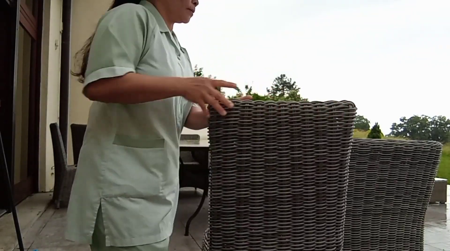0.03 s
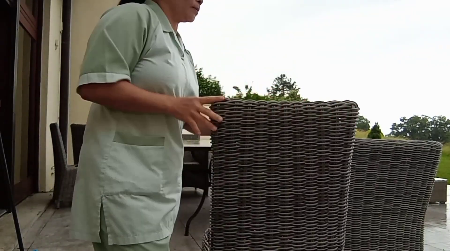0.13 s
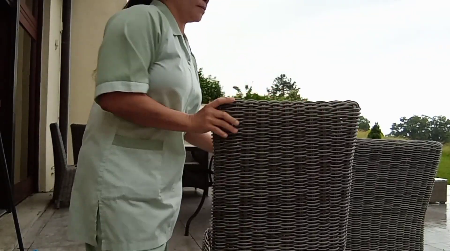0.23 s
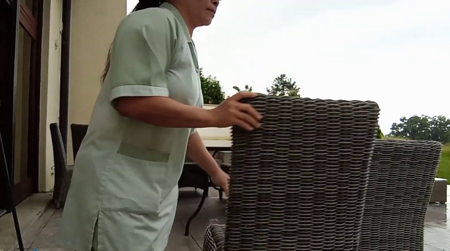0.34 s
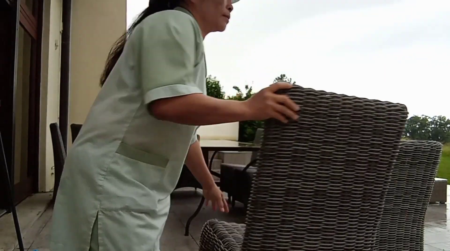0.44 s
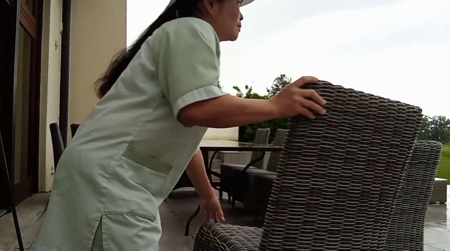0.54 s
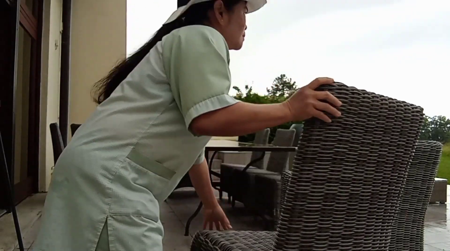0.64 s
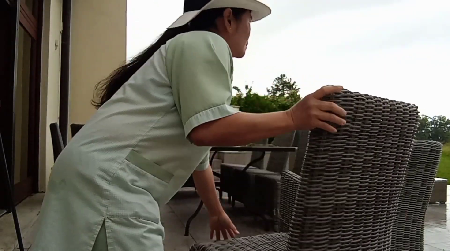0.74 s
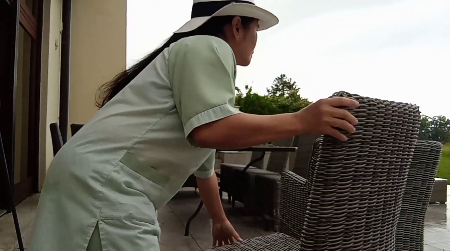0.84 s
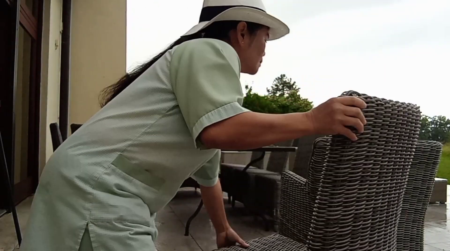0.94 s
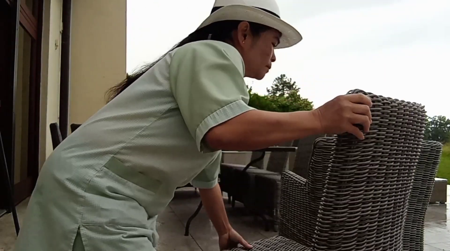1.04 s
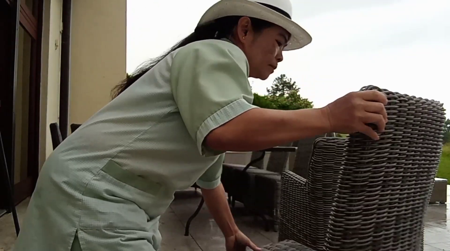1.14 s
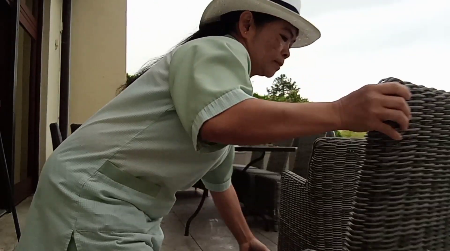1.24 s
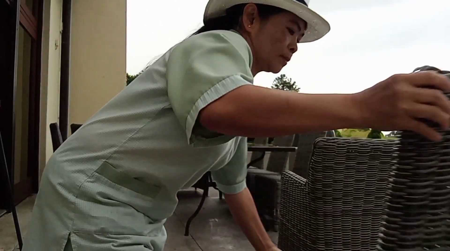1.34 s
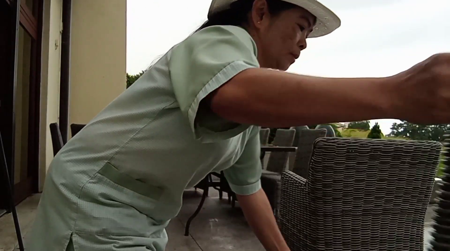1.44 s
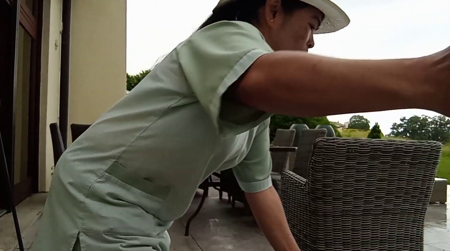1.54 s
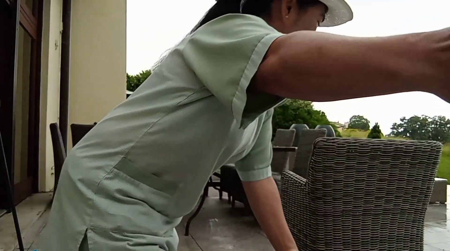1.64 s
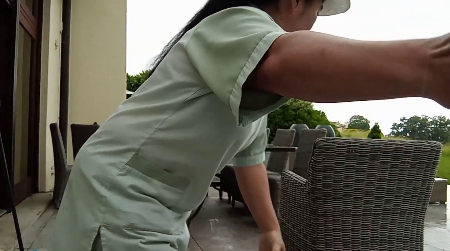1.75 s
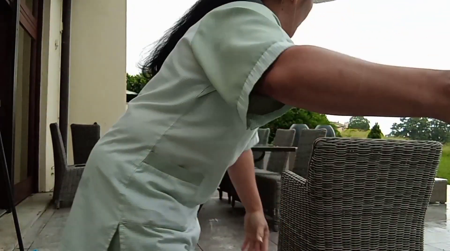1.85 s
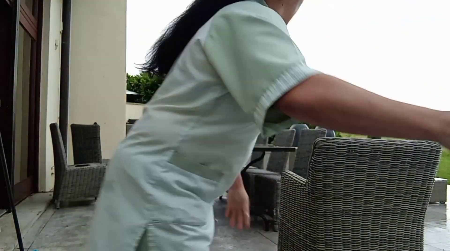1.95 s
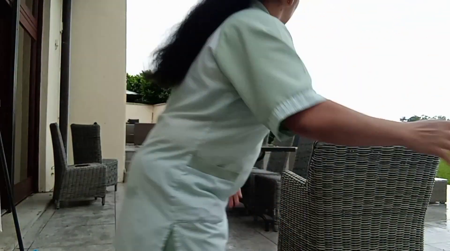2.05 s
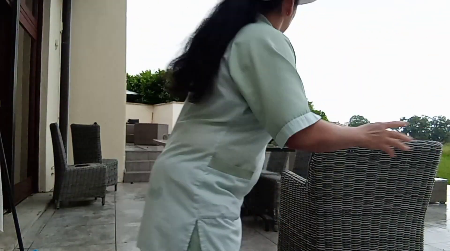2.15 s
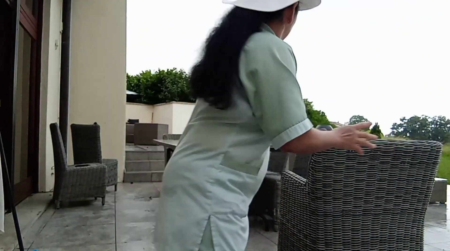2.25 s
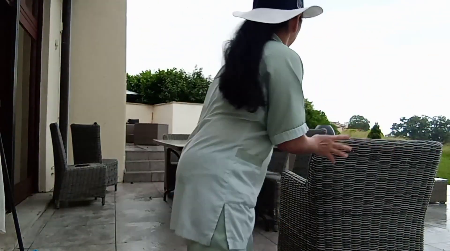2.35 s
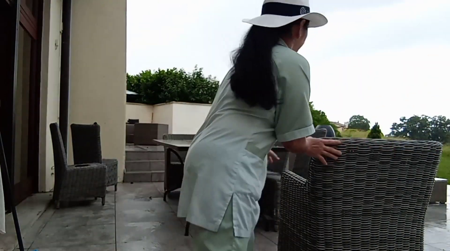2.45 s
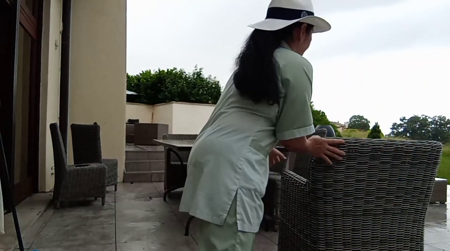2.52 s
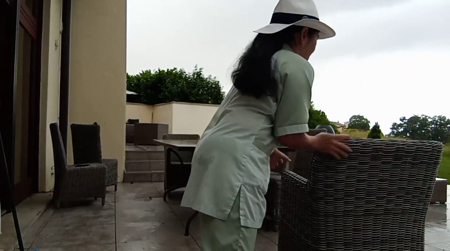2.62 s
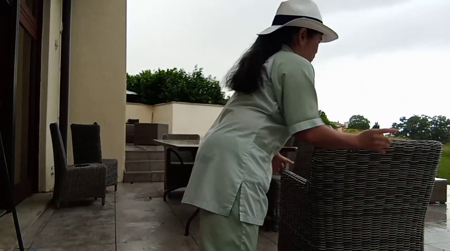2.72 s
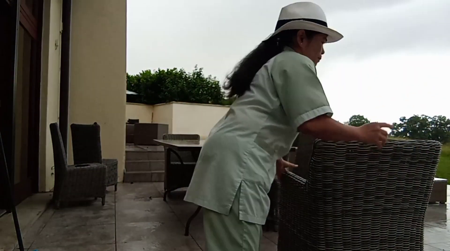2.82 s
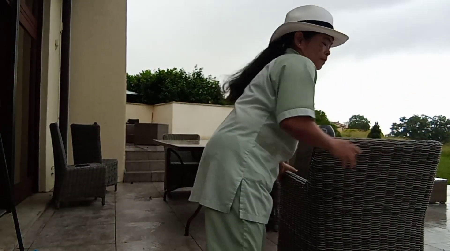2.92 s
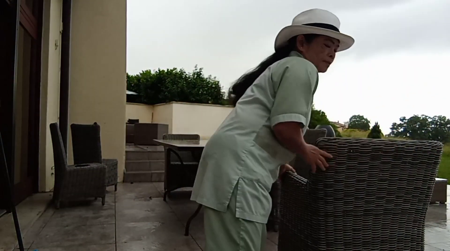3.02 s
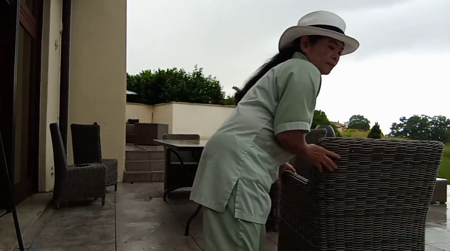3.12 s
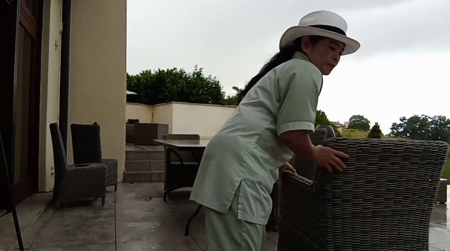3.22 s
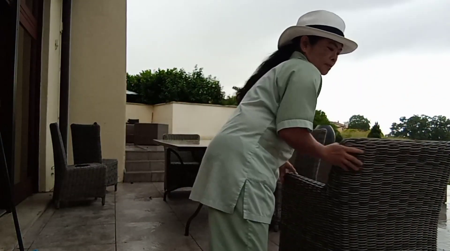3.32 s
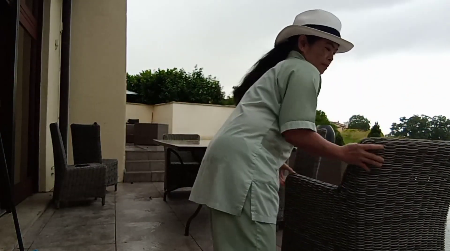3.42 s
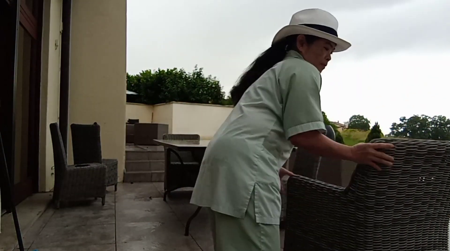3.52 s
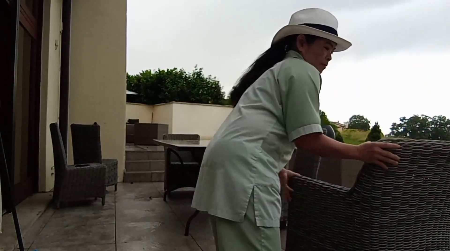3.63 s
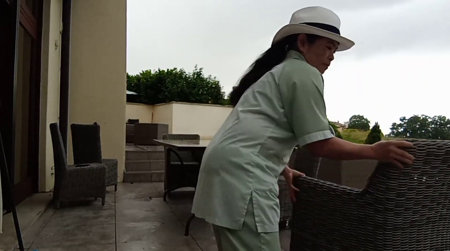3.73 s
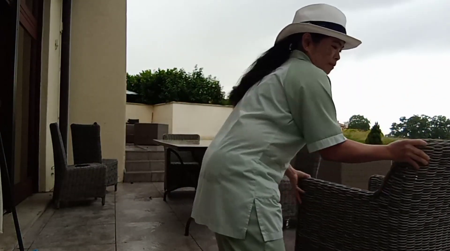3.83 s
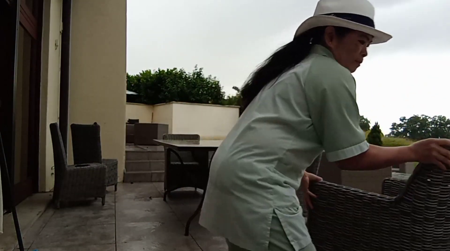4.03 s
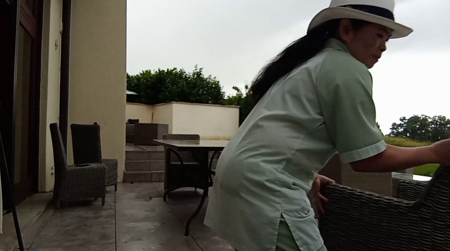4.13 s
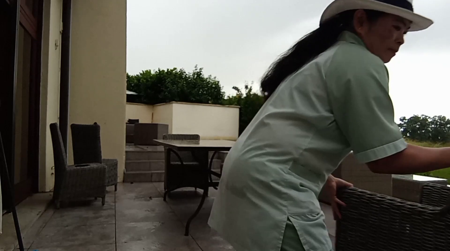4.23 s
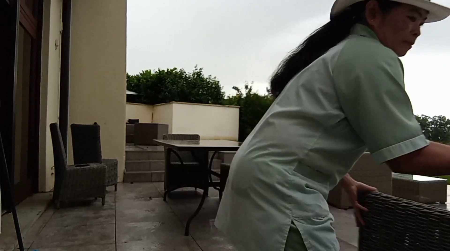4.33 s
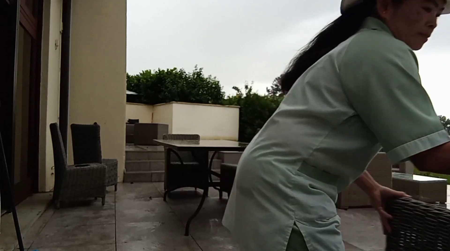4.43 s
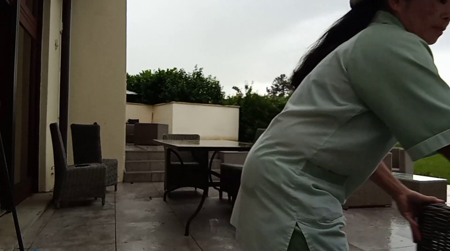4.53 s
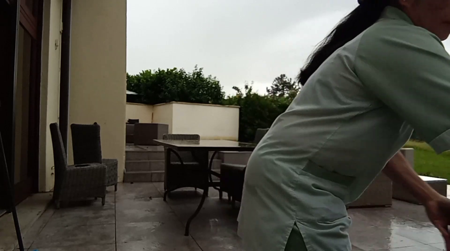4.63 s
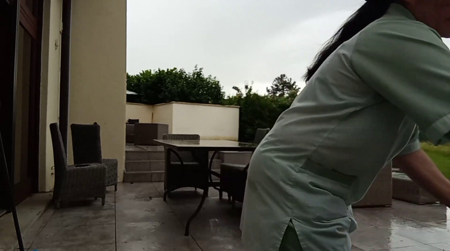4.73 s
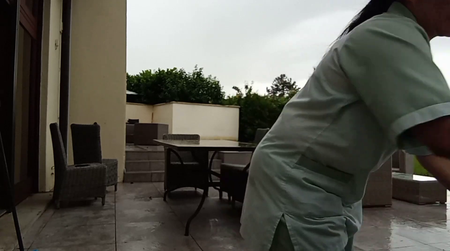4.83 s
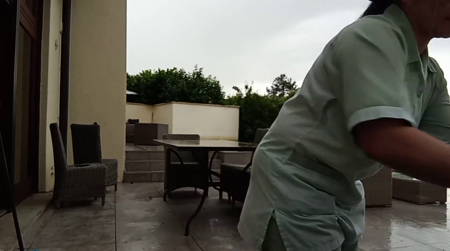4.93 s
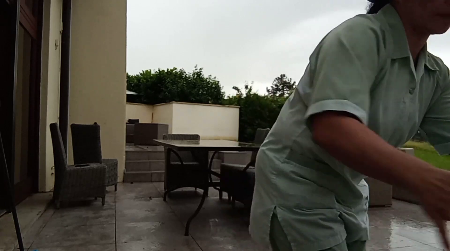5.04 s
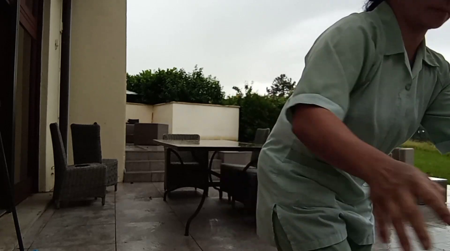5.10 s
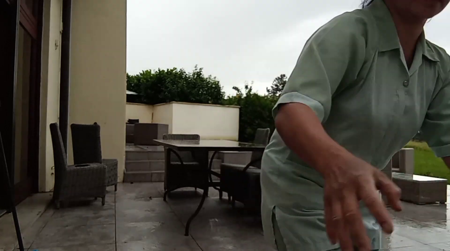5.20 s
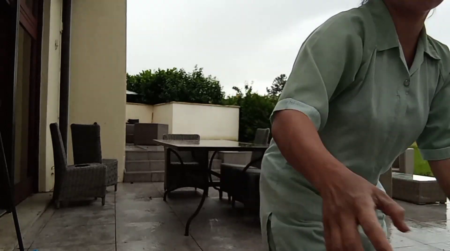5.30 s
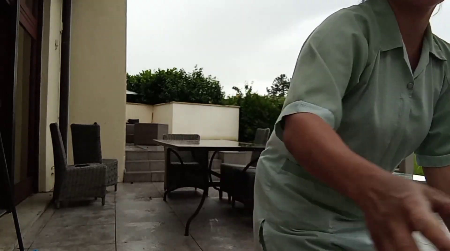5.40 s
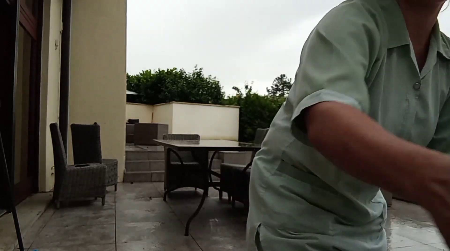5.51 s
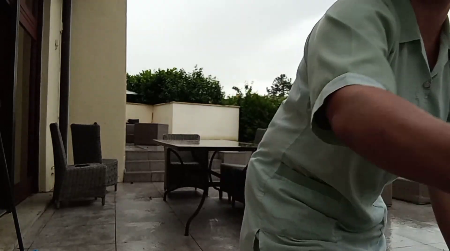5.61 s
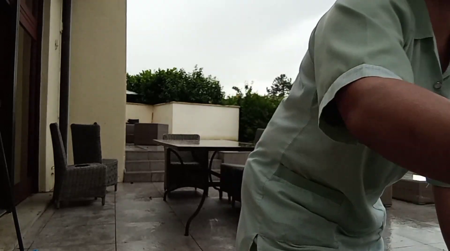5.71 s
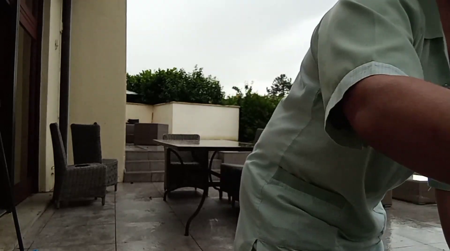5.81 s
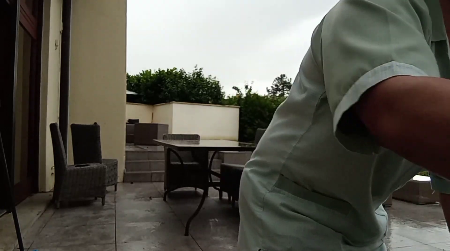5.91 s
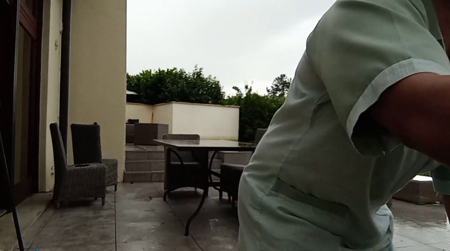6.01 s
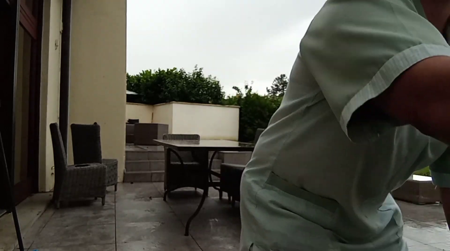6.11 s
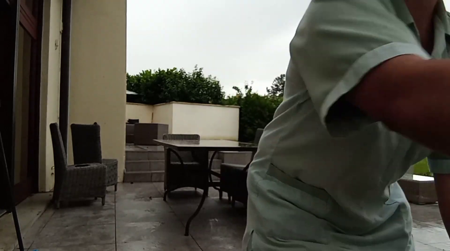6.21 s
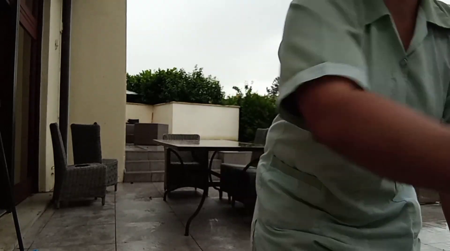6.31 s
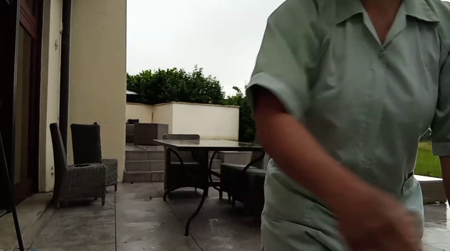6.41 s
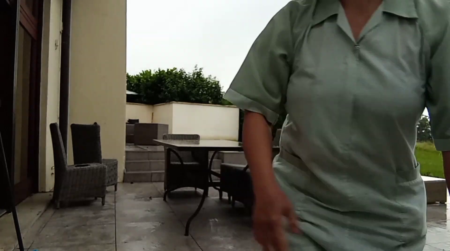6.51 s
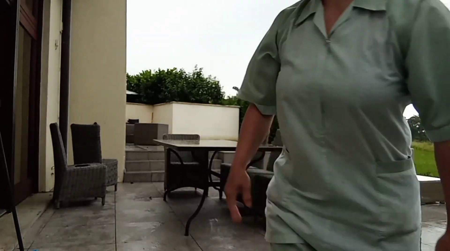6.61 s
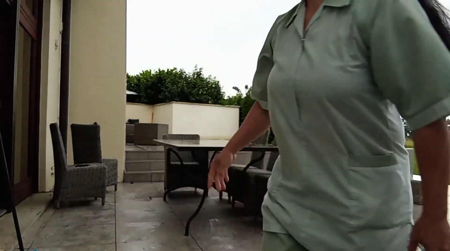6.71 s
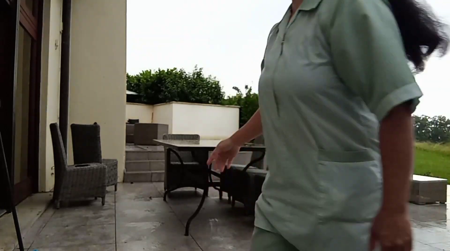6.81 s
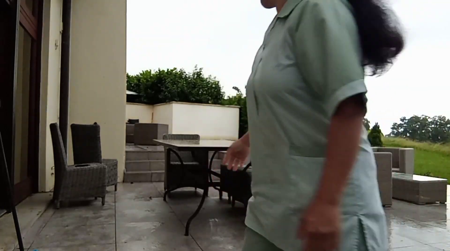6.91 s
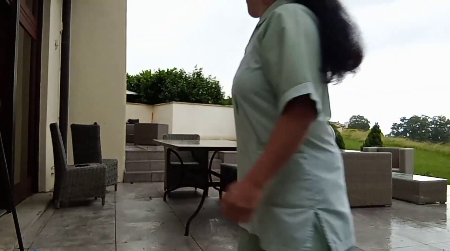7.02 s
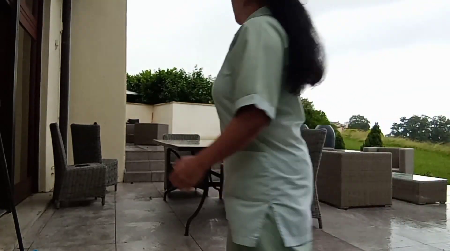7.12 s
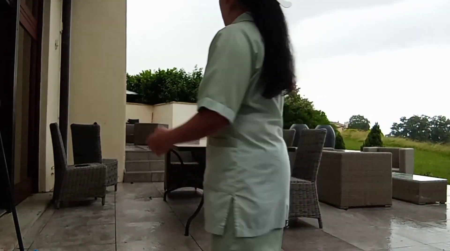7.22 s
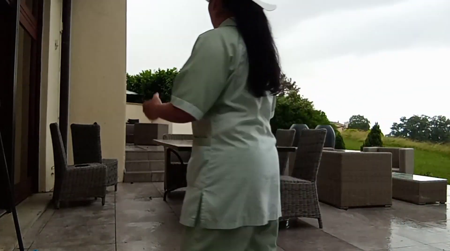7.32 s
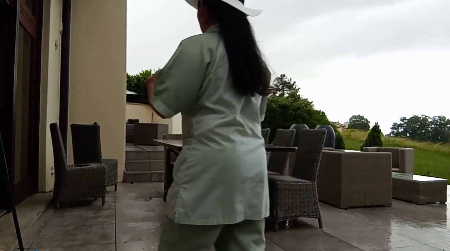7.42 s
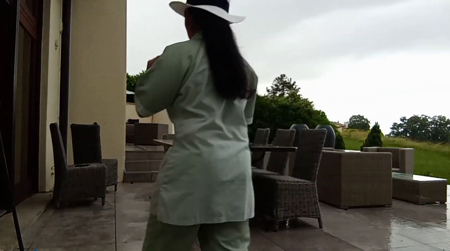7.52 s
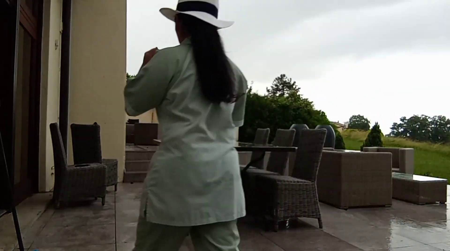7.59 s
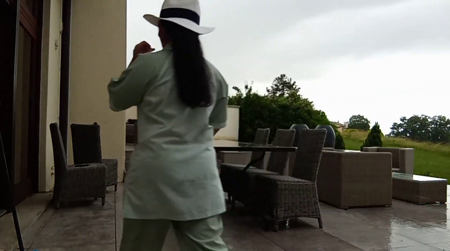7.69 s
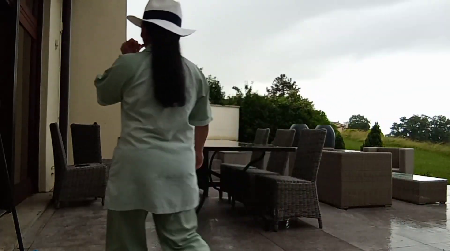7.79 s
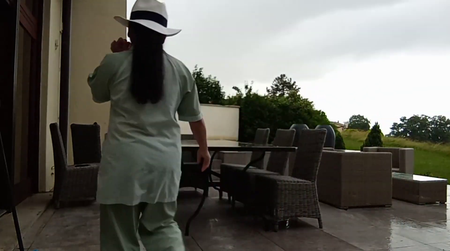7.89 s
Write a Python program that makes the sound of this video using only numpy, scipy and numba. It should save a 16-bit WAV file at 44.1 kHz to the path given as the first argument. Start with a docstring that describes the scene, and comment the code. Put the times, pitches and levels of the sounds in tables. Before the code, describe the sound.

Close to a phone on a paved terrace, a wicker chair creaks, then drags in a rough, low, stuttering groan with gritty crackle. After a quiet gap with a faint shoe scuff, a heavier armchair is dragged the same way and knocks down. A shorter, lighter, crackly scrape follows, then only soft clothing rustle and distant traffic hum. A short wall echo trails the close sounds.

```python
"""Two wicker chairs are tipped, dragged and set down on a paved terrace, a metre or two from a phone.
Their feet stick and slip: pulses ring the resonances of the frames, and short sines are their thin rods.
Filtered random grains make the grit under the feet and the crackle of the weave; thin hiss makes the ticks.
A shoe scuffs, clothes rustle and an insect trills once, as shaped grains and hiss.
Far traffic hums as banded noise; the house wall returns a short echo of the close sounds."""
import sys
import numpy as np
from scipy import signal
from scipy.fft import rfft, irfft, next_fast_len
from scipy.io import wavfile
from scipy.ndimage import map_coordinates
from numba import njit

SR = 44100
rng = np.random.default_rng(int(sys.argv[2]) if len(sys.argv) > 2 else 0)


def digitize_waveform(pressure):
    """Quantize a signal to 16-bit integers and store it at the path in sys.argv[1].

    Rows of a 2-D input are taken as channels; values are limited to [-1, 1].
    """
    field = np.atleast_2d(pressure).T
    bounded = np.clip(field, -1, 1)
    quanta = np.round(bounded * 32767).astype(np.int16)
    wavfile.write(sys.argv[1], SR, quanta)


N = 350595
T = np.arange(N) / SR  # time [s]

# Far traffic spectrum: (frequency [Hz], relative level [dB per Hz])
TRAFFIC_SPECTRUM = [(25, -45), (45, -20), (70, 3), (150, -8.5), (200, -8), (450, -13), (720, -9),
                    (1700, -16), (2400, -24.5), (3000, -34.5), (3500, -42.5), (4100, -41.5), (6300, -74),
                    (13000, -59), (15500, -42)]
# Far engine notes: (frequency [Hz], width [Hz], mean level [dB])
ENGINE_NOTES = [(92, 1.9, -61.5), (191, 3.8, -63.5), (287.3, 17, -65)]
# Clothing: (middle [s], level [dB], half length [s])
RUSTLES = [(2.7, -67.5, 0.037), (7.1, -87, 0.73), (7.187, -80, .03), (7.25, -80, 0.028),
           (7.754, -80, 0.054)]
# Thin bright ticks: (time [s], level [dB], t60 [s])
TICKS = [(0.867, -32.5, 0.019), (1.891, -41, .04), (1.908, -42, 0.082), (3.357, -48, .04),
         (3.527, -56, 0.11), (4.992, -45, .04)]
# Thin rods of the frame sing: (start [s], level before waver and rise [dB], pitch [Hz], t60 [s])
ROD_NOTES = [(3.385, -34, 1360, 0.067), (3.43, -36, 1470, .1), (3.46, -39, 1550, .1), (4.01, -47, 1440, .2),
             (4.489, -42, 1610, 0.22), (4.718, -43, 1615, .2), (5.046, -43, 1570, 0.23),
             (5.74, -44, 1590, .08), (5.856, -38, 1210, .06), (6.07, -34, 1610, .08)]
# The weave and the grit crack: (start [s], coarse level before the rise [dB],
# finest grains above the coarse [dB], t60 [s])
CRACKS = [(0.132, -56.5, 9, 0.086), (0.413, -52.5, 8, 0.11), (0.6574, -48, -4, 0.071),
          (0.864, -31.5, -3, 0.026), (0.9797, -42, -14, 0.042), (1.0185, -38, -12, 0.1),
          (1.121, -46.5, -33, 0.085), (1.191, -41, -12, 0.066), (1.231, -41, -12, 0.12),
          (1.311, -34, -31, 0.042), (1.398, -32, -24, 0.045), (1.475, -27, -6, 0.035),
          (1.545, -36.5, -4, 0.091), (1.703, -34, -17, 0.029), (1.778, -39, -19, 0.06),
          (1.82, -38, -14, 0.14), (1.889, -31, -4, 0.067), (1.906, -32, -8, 0.052),
          (3.299, -49, -22, 0.066), (3.356, -35, -2, 0.07), (3.3724, -32, 7, 0.047),
          (3.4616, -42, 2, 0.053), (4.1605, -45, -37, 0.036), (4.233, -35, -10, 0.076),
          (4.336, -34, -11, 0.082), (4.362, -33.5, -5, 0.12), (4.407, -35, -21, 0.043),
          (4.4702, -43, -5, 0.2), (4.531, -43, -15, 0.058), (4.5724, -37.5, 9, 0.092),
          (4.588, -32, -26, .05), (4.796, -36.5, -15, 0.044), (4.9174, -37.5, -10, 0.12),
          (4.991, -34, -1, 0.056), (5.686, -46, -15, 0.099), (5.734, -32, -8, 0.071),
          (5.8346, -35.5, -34, 0.067), (5.864, -35.5, -18, 0.039), (5.9033, -36, 2, 0.036),
          (5.9278, -28.5, -13, 0.052), (5.97, -35.5, -31, .06), (6.0246, -44, 5, 0.047),
          (6.07, -39, -18, 0.031), (6.086, -35, -4, 0.044), (6.1664, -45.5, 1, 0.087),
          (6.408, -56.5, -2, .12)]
# Spectrum of grit: (frequency [Hz], relative level [dB per Hz])
GRIT_SPECTRUM = [(1350, 1.5), (2300, -4.5), (3510, -7), (3840, -4), (4300, -8), (5530, -6), (5940, -8),
                 (7110, -18.5), (9210, -10), (11200, -20), (13300, -27.5), (14200, 1), (15200, 6),
                 (16000, 1)]
# Middle of the band in which coarse grit sings, before it wavers: (time [s], frequency [Hz])
SINGING_BAND = [(1.03, 3940), (1.47, 3900), (1.9, 5240), (3.37, 2000), (4.37, 3240), (4.6, 2770),
                (4.99, 3740), (5.69, 4250), (5.84, 5100), (5.87, 4250), (5.93, 3840), (5.97, 5260),
                (6.09, 3620)]
# Resonances of each frame, before flexing and damping: (frequency [Hz], width [Hz], level [dB])
SIDE_CHAIR = [(126.5, 31, -10), (167, 25.6, -5.5), (229.3, 36, 0.5), (274, 36.3, -0.5), (320, 39, -4.5),
              (398, 75, -7.5), (485, 48, -6.5), (663, 99, -14), (825, 75, -11), (947, 46, -11.5),
              (1068, 160, -18.5), (1583, 173, -16), (2158, 47, -19), (2620, 60, -26)]
ARMCHAIR = [(115.7, 17, -16.5), (176, 19, -15), (234.4, 30, -10), (288, 38, -2), (310, 31, -9),
            (392, 60, -14.5), (481, 119, -11), (494, 179, -13.5), (663, 58, -12.5), (838, 45, -9.5),
            (985, 62, -12.5), (1467, 48, -19), (1596, 51, -17), (2140, 50, -24), (2720, 340, -33)]
# Feet catch and judder: (time [s], peak of the judder [dB], judder rate [Hz],
# rasp of the upper modes above that peak [dB], length [s])
JOLTS = [(0.02, -48, 264, -13, 0.014), (0.088, -36.5, 264, -13.0, 0.015), (0.541, -26.5, 320.0, -12, 0.016),
         (0.601, -25, 331, -9.5, 0.044), (0.726, -35, 300, -7, 0.023), (0.788, -30, 270, -6.5, 0.024),
         (0.801, -30.5, 280, -13, 0.019), (0.893, -20.5, 379, -19, 0.0078), (0.906, -29, 293, -17, 0.014),
         (0.918, -19, 289, -18, 0.023), (0.985, -31.5, 317, -13.0, 0.018), (1.143, -23, 260, -11, 0.013),
         (1.208, -24.5, 248, -14, 0.033), (1.243, -30, 307, 3.5, 0.0095), (1.264, -15.5, 324, -5.5, 0.024),
         (1.324, -24.5, 270, -17, 0.02), (1.348, -21.5, 275, -9, 0.014), (1.402, -22, 282, -20, 0.012),
         (1.448, -20.5, 290, -22, 0.012), (1.48, -18.5, 261, -19, 0.038), (1.496, -12.5, 274, -14, 0.015),
         (1.527, -14.5, 251, -12, 0.016), (1.555, -16, 262, -5.5, 0.019), (1.581, -18.5, 273, -5, 0.019),
         (1.594, -18, 308, -27, 0.019), (1.625, -17, 284, -11.5, 0.044), (1.651, -15, 247, -24, 0.01),
         (1.674, -16, 244, -7, 0.014), (1.709, -15.5, 327, -16, 0.02), (1.732, -19, 282, -8, 0.02),
         (1.747, -20.5, 292, -9, 0.028), (1.789, -17, 258, -17, 0.021), (1.829, -21, 242, -30, 0.017),
         (1.848, -19, 295, -13, 0.016), (1.954, -31, 299, -12.0, 0.014), (2.004, -34.5, 256, -13, 0.011),
         (3.379, -30.5, 294, -4.5, 0.015), (3.432, -36, 300, -6, 0.037), (3.466, -22.5, 323, -2, 0.013),
         (3.477, -18.5, 308, -3, 0.017), (3.517, -19.5, 287, -2, 0.028), (3.544, -19, 302, -4.5, 0.023),
         (3.57, -29.5, 287, -14, 0.028), (4.066, -36.5, 288, 0, 0.022), (4.1, -32.5, 274, -2, 0.035),
         (4.243, -27, 316, -5, 0.013), (4.284, -23.5, 302, -7, 0.029), (4.345, -24, 303, -13, 0.024),
         (4.362, -21, 313, -9, 0.011), (4.416, -16.5, 315, -11, 0.017), (4.434, -18, 318, -14, 0.011),
         (4.47, -22, 314, -1, 0.016), (4.505, -20, 277.5, -11, 0.024), (4.555, -20.5, 308, -24, 0.02),
         (4.62, -19.5, 310, -19, 0.031), (4.684, -21, 295, -22, 0.0082), (4.715, -19.5, 329, -14, 0.017),
         (4.745, -19, 297, -11, 0.021), (4.782, -17, 327, -35, 0.03), (4.824, -16.5, 299, -34, 0.021),
         (4.853, -21.5, 305, -30, 0.025), (4.926, -24, 302, -25, 0.013), (4.963, -22, 283, -8, 0.022),
         (5.063, -28, 330, -4, 0.013), (5.079, -31, 343, -13, 0.011), (5.129, -32, 313, -8, 0.022),
         (5.75, -37, 270, -1, 0.017), (5.763, -34, 298, -9, 0.013), (5.85, -38, 310, -6, 0.0093),
         (5.866, -32.5, 362, 3.5, 0.013), (5.902, -33, 356, -10.0, 0.0097), (5.967, -22.5, 260, -7, 0.013),
         (6.001, -23.5, 323, -6, 0.0062), (6.03, -32, 312.0, -5, 0.01), (6.098, -27.5, 310, -7, 0.022),
         (6.126, -21, 284, -20, 0.0064), (6.154, -25, 278, -14, 0.0097), (6.174, -29.5, 256, -13, 0.014)]
# A chair lands: same columns as the jolts
KNOCKS = [(.8655, -9, 276, -6.5, 0.0125), (5.039, -10.5, 314, -8.5, 0.0175)]
# One table per drag: (time [s], frame rumble [dB], coarse grit [dB])
DRAGS = [
    [(0.0, -38.5, -52.5), (0.24, -68.5, -75), (0.44, -48, -60.5), (0.56, -41.5, -65), (0.86, -44.5, -59.5),
     (0.88, -22, -49), (0.95, -45, -61.5), (1.16, -51, -61.5), (1.22, -41, -56.5), (1.26, -41.5, -47),
     (1.46, -24, -44.5), (1.65, -25.5, -46), (1.85, -29.5, -50.5), (1.88, -43, -57.5), (1.92, -33.5, -55),
     (1.975, -48, -52.5), (2.03, -56, -85), (2.13, -55, -100), (2.2, -63, -105)],
    [(3.2, -69, -72), (3.33, -47, -62), (3.38, -44, -47.5), (3.45, -39, -51.5), (3.575, -43, -63.5),
     (3.6, -56, -71), (3.66, -52, -82), (3.71, -49.5, -66), (4.23, -41, -53), (4.37, -33.5, -48.5),
     (4.46, -29.5, -51), (4.53, -29.5, -48), (4.6, -30, -42), (4.68, -37.5, -46), (4.82, -29.5, -48.5),
     (4.88, -41, -51), (5.05, -37, -54), (5.1, -37, -60.5), (5.22, -77, -79)],
    [(5.66, -76, -101), (5.684, -72, -40.5), (5.724, -44, -55.5), (5.745, -58, -49), (5.82, -41, -49.5),
     (5.86, -33, -49), (5.94, -41.5, -50.5), (6.05, -39.5, -53.5), (6.2, -42, -52.5), (6.26, -60, -64.5),
     (6.3, -65, -86)],
]
CHAIRS = [SIDE_CHAIR, ARMCHAIR, SIDE_CHAIR]  # the chair in each drag
# Fine grit above the coarse, one value per drag: (level [dB])
FINE_DB = [-14, -14.5, -13]
# Finest grit above the coarse when the grit is at LOUD_GRIT_DB, one value per drag: (level [dB])
FINEST_DB = [-15, -20, -8]

TRAFFIC_DB = -54.5
WALL_DB, WALL_T60_S = -16, 0.26
WALL_LOW_HZ, WALL_HIGH_HZ = 300, 2350  # the open terrace returns little bass
TOP_HZ = 15900  # upper limit of the phone

TRILL_START_S, TRILL_PUFFS_PER_S, TRILL_PUFFS, TRILL_DB = 2.975, 17.8, 5, -83

SCUFF_TOP_S, SCUFF_DB, SCUFF_HOLD_S = 2.555, -58, 0.053
SCUFF_RISE_DB_PER_S, SCUFF_FALL_DB_PER_S = 520, 327
SCUFF_START_HZ, SCUFF_END_HZ, SCUFF_GLIDE_S = 4760, 3380, 0.057

TICK_HZ, TICK_WIDTH_HZ, TICK_RISE_S = 9080, 2000, 0.0026  # width of each of two filters

GRIT_EDGES_HZ = (7200, 13300)  # between coarse, fine and finest grains
CRACK_RISE = 0.14  # share of t60 spent rising
CRACK_FINE_DB, CRACK_FINE_SHARE = -8, 0.37  # fine grains follow the finest part of the way
CRACK_RING_DB = -5.5  # ring of the upper modes against the coarse grains

UPPER_HZ, RASP_HZ = 600, 420  # modes above these count as upper, in the drags and in the rasp
JOLT_RISE = 1.05  # a judder swells about as slowly as it fades
DRIFT = 0.022  # typical share by which the modes wander as the frame flexes

LOAD_DB = 1.4  # how far each mode typically swells and sinks
STUTTER_DB = 1.8  # the rumble breaks up as the feet catch and let go
DEEP_HZ, HEAVY_DB, DEEP_SLOPE = 200, -35, 0.17  # deep modes weaken [dB per dB] below a heavy rumble
UPPER_DB, UPPER_FROM_GRIT = [-0.5, -2.5, -1.3], 0.6  # upper modes: offset per drag, share from grit
LOUD_GRIT_DB, FINEST_SLOPE = -55, 1.1  # the finest grit grows faster than the coarse [dB per dB]


def undb(db):
    """Decibels to amplitude."""
    return 10 ** (np.asarray(db) / 20)


def unit(x):
    """Scale x to an RMS of 1."""
    return x / np.sqrt(np.mean(x ** 2))


@njit
def svf(x, hz, width):
    """State-variable band-pass, gain 1 at a centre that may move."""
    out, band_state, low_state = np.empty(len(x)), 0., 0.
    for i in range(len(x)):
        g = np.tan(np.pi * hz[i] / SR)
        k = width / hz[i]
        v = (band_state + g * (x[i] - low_state)) / (1 + g * (g + k))
        band_state = 2 * v - band_state
        low_state += 2 * g * v
        out[i] = k * v
    return out


def band(x, hz, width):
    """Band-pass with a fixed or moving centre."""
    return svf(x, hz * np.ones(len(x)), 1. * width)


def soft(x, hz):
    """Plastic feet round off every slip: a low-pass."""
    return signal.lfilter(*signal.butter(2, hz, fs=SR), x)


def split(x, edges_hz):
    """Cut x into neighbouring bands."""
    size = next_fast_len(len(x))
    spectrum = rfft(x, size)
    zone = np.searchsorted(edges_hz, np.arange(size // 2 + 1) * SR / size)
    return np.array([irfft(spectrum * (zone == k), size)[:len(x)] for k in range(len(edges_hz) + 1)])


def colour(x, points):
    """Shape x by a spectrum of (frequency [Hz], level [dB])."""
    hz, db = np.transpose(points)
    size = next_fast_len(len(x))
    bins_hz = np.arange(size // 2 + 1) * SR / size
    gain = undb(np.interp(np.log(bins_hz + 1), np.log(hz), db))
    return irfft(rfft(x, size) * gain, size)[:len(x)]


def walk(rate):
    """Random levels, a new one every 1 / rate s, joined smoothly."""
    coarse = map_coordinates(rng.standard_normal(1000), [T[::64] * rate], order=3)
    return coarse.repeat(64)[:N]


def clicks(per_s, spread_db):
    """Random slips, most small and a few large."""
    happens = rng.random(N) < per_s / SR
    size = undb(spread_db * np.minimum(rng.standard_exponential(N), 4.5))
    return unit(happens * rng.standard_normal(N) * size)


def scrape(per_s, spread_db, sing):
    """Grains in three sizes, partly shared and partly their own; the coarse sing in a wavering band."""
    x = np.array([clicks(per_s, spread_db) for _ in range(3)])
    x = x + .5 * x.sum(axis=0)
    octaves = np.clip(0.24 * walk(45), -1, 1)
    sing_hz = np.interp(T, *np.transpose(SINGING_BAND)) * 2 ** octaves
    x[0] += sing * svf(x[0], sing_hz, 490.0)
    return np.array([unit(split(colour(v, GRIT_SPECTRUM), GRIT_EDGES_HZ)[k]) for k, v in enumerate(x)])


def ring(x, modes, damping, gains, edge_hz, flex=0.94):
    """Frame modes below and above edge_hz answer the force x; flex bends neighbours opposite ways."""
    low, upper = np.zeros((2, len(x)))
    for k, ((hz, width, db), gain) in enumerate(zip(modes, gains)):
        part = low if hz < edge_hz else upper
        bend = flex ** (-1) ** k  # flex, then 1 / flex, in turn
        part += gain * undb(db) * band(x, hz * bend, damping * width)
    return low, upper


def distance():
    """Far traffic: noise bands swell together and flicker alone, with a few wavering engine notes."""
    noise = unit(colour(rng.standard_normal(N), TRAFFIC_SPECTRUM))
    octaves = split(noise, 50 * 2 ** np.arange(8))
    swell = walk(0.65)
    out = sum(part * undb(TRAFFIC_DB + 0.25 * swell + 0.86 * walk(3.18)) for part in octaves)
    for hz, width, db in ENGINE_NOTES:
        out += undb(db + 1.5 * walk(3)) * unit(band(rng.standard_normal(N), hz, width))
    return out


def trill():
    """An insect: short even puffs of narrow hiss."""
    starts = TRILL_START_S + np.arange(TRILL_PUFFS) / TRILL_PUFFS_PER_S
    size = sum(undb(TRILL_DB) * np.exp(-((T - s) / 0.022) ** 2) for s in starts)
    return size * unit(band(band(rng.standard_normal(N), 6000, 1100), 6000, 1500))


def wall_echo(near):
    """The house wall returns the close sounds as a band of fading noise, after an 8 ms gap."""
    t = T[:SR // 2]
    echo = rng.standard_normal(len(t)) * undb(-60 * t / WALL_T60_S) * (t > .008)
    echo = signal.lfilter(*signal.butter(1, [WALL_LOW_HZ, WALL_HIGH_HZ], "band", fs=SR), echo)
    return undb(WALL_DB) * signal.fftconvolve(near, echo / np.linalg.norm(echo))[:N]


def rustles():
    """Clothing: soft, flickering swells of coarse and fine grains."""
    size = sum(undb(db) * np.exp(-((T - s) / length) ** 2) for s, db, length in RUSTLES)
    coarse, fine, _ = scrape(9000, 1.4, 1.6)
    return size * undb(2.1 * walk(71)) * (coarse + 0.44 * fine)


def scuff():
    """A sole brushes the slab: hiss in a sliding band, with some fine grit."""
    t = T - SCUFF_TOP_S
    rise = np.minimum(SCUFF_RISE_DB_PER_S * t, 0)
    fall = SCUFF_FALL_DB_PER_S * (SCUFF_HOLD_S - t)
    db = SCUFF_DB + np.minimum(rise, fall)
    # the slide starts 11 ms before the top
    hz = np.interp(t + 0.011, [0, SCUFF_GLIDE_S], [SCUFF_START_HZ, SCUFF_END_HZ])
    grains = clicks(17000, 1.7)
    hiss = unit(svf(svf(grains, hz, 2000.0), hz, 2500.0))
    grit = undb(-15.5) * unit(band(grains, 7900, 2500))
    return (hiss + grit) * undb(db)


def ticks():
    """Thin ticks: high hiss that rises within a few ms and fades."""
    out = np.zeros(N)
    t = T[:SR // 8] - TICK_RISE_S
    for s, db, t60 in TICKS:
        grains = rng.standard_normal(len(t)) * undb(1.6 * rng.standard_exponential(len(t)))
        hiss = unit(band(band(grains, TICK_HZ, TICK_WIDTH_HZ), TICK_HZ, TICK_WIDTH_HZ))
        slope_s = np.where(t < 0, TICK_RISE_S, t60)  # time for 60 dB
        i = int((s - TICK_RISE_S) * SR)
        out[i:i + len(t)] += hiss * undb(db - 60 * np.abs(t) / slope_s)
    return out


def rods():
    """Thin rods: each sine swells within 6 ms, wavers in level and fades."""
    out, t = np.zeros(N), T[:SR // 5]
    for s, db, hz, t60 in ROD_NOTES:
        i = int(s * SR)
        size = undb(db - 60 * t / t60) * np.minimum(t / .006, 1)
        out[i:i + len(t)] += size * np.sin(2 * np.pi * hz * t)
    return out * undb(2.8 * walk(60))


def cracks():
    """Weave and grit: bursts of grains that rise fast, die away and ring the upper modes of the frame."""
    size = np.zeros((3, N))
    for s, db, finest_db, t60 in CRACKS:
        t, i = T[:int(t60 * SR)], int(s * SR)
        fine_db = CRACK_FINE_DB + CRACK_FINE_SHARE * finest_db
        sizes_db = db + np.array([[0], [fine_db], [finest_db]])
        rise = np.minimum(t / (CRACK_RISE * t60), 1)
        size[:, i:i + len(t)] += undb(sizes_db - 60 * t / t60) * rise
    grains = size * scrape(9000, 1.6, 3.0)
    gains = np.array(SIDE_CHAIR)[:, 0] / 1000  # higher modes answer more strongly
    upper = ring(size[0] * clicks(3000, 2.5), SIDE_CHAIR, 0.93, gains, UPPER_HZ)[1]
    return grains.sum(axis=0) + undb(CRACK_RING_DB) * unit(upper) * np.std(grains[0])


def blows(table, rise, damping, lead, rasp_hz, sharp):
    """A foot chatters for a few cycles and rings the frame; the slab under it damps the ring."""
    out, t = np.zeros(N + SR), T[:SR // 11]
    starts = [drag[0][0] for drag in DRAGS]
    for s, db, hz, rasp_db, length in table:
        # rise under 1 brings the peak forward
        swell = np.sin(np.pi * np.clip(t / length, 0, 1) ** rise) ** 1.72
        pushes = np.exp(sharp * np.cos(2 * np.pi * hz * t))
        force = swell * (pushes - pushes.mean())
        rasp = swell * soft(rng.standard_normal(len(t)), rasp_hz)
        modes = CHAIRS[np.searchsorted(starts, s, "right") - 1]
        struck = undb(1.7 * rng.standard_normal(len(modes)))
        flex = 1 + DRIFT * rng.standard_normal()
        judder = sum(ring(force, modes, damping, np.ones(len(modes)), UPPER_HZ))
        upper = ring(rasp, modes, 0.72, struck, RASP_HZ, flex)[1]  # thin rods ring on freely
        both = judder / np.abs(judder).max() + undb(rasp_db) * upper / np.abs(upper).max()
        i = int((s - lead * length) * SR)  # the push starts ahead of the listed time
        out[i:i + len(t)] += undb(db) * both
    return out[:N]


def drags():
    """Dense stick-slip rings the frame while grit grinds under the feet."""
    out = np.zeros(N)
    slips = soft(clicks(1500, 0.98), 3360)
    grit = scrape(5000, 1.43, 0.84)
    grit *= undb(1.9 * walk(70) + 0.89 * np.array([walk(40) for _ in grit]))
    uneven, stutter = undb(2.54 * walk(40)), undb(STUTTER_DB * walk(55))
    flex = 1 + DRIFT * walk(12)
    # modes fade in and out as the load shifts between the feet; neighbours swing in opposition
    load = np.array([(-1) ** k * undb(LOAD_DB * walk(18)) for k in range(len(ARMCHAIR))])
    for table, modes, ring_db, fine_db, finest_db in zip(DRAGS, CHAIRS, UPPER_DB, FINE_DB, FINEST_DB):
        s, *columns = np.transpose(table)
        at = slice(int(s[0] * SR), int(s[-1] * SR))
        low_db, grit_db = (np.interp(T[at], s, column) for column in columns)
        upper_db = ring_db + low_db + UPPER_FROM_GRIT * (grit_db - low_db)
        finest_grit_db = LOUD_GRIT_DB + finest_db + FINEST_SLOPE * (grit_db - LOUD_GRIT_DB)
        sizes_db = [grit_db, grit_db + fine_db, finest_grit_db]
        # the deepest modes ring fully only under a heavy drag
        weakened = undb(DEEP_SLOPE * np.minimum(low_db - HEAVY_DB, 0))
        deep = np.where(np.array(modes)[:, :1] < DEEP_HZ, weakened, 1)
        gains = load[:len(modes), at] * deep
        low, upper = ring(slips[at], modes, 0.79, gains, UPPER_HZ, flex[at])
        rumble = undb(low_db) * unit(stutter[at] * low)
        out[at] += uneven[at] * (rumble + undb(upper_db) * unit(upper))
        out[at] += (undb(sizes_db) * grit[:, at]).sum(axis=0)
    return out


def scene():
    """Close sounds on the terrace, their echo off the house wall, and the far background."""
    near = rustles() + scuff() + ticks() + rods() + cracks()
    near += blows(JOLTS, JOLT_RISE, damping=6.5, lead=0.5, rasp_hz=910, sharp=0.31)
    near += blows(KNOCKS, 0.92, damping=7.2, lead=0.1544, rasp_hz=1030, sharp=1.0)
    near += drags()
    return (distance() + trill() + wall_echo(near) + near)[None]


def record(dry):
    """The phone cuts the top with a steep low-pass."""
    return signal.sosfilt(signal.ellip(10, .2, 80, TOP_HZ, fs=SR, output="sos"), dry)


dry = scene()
out = record(dry)
digitize_waveform(out)
```